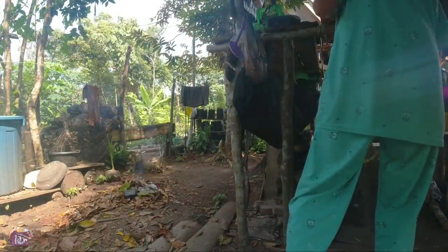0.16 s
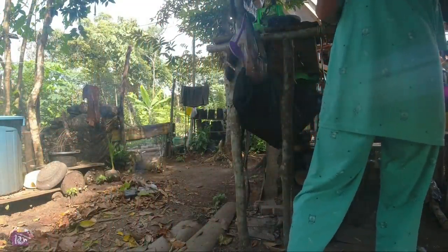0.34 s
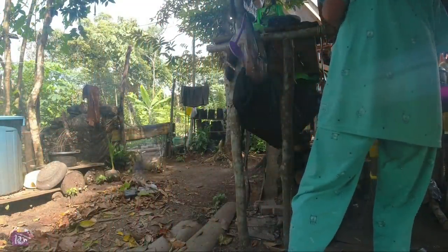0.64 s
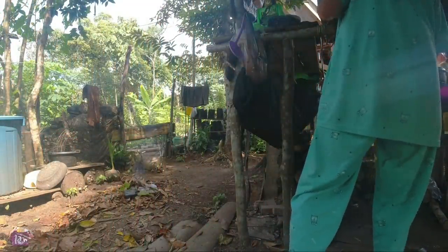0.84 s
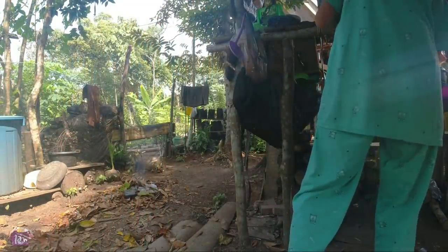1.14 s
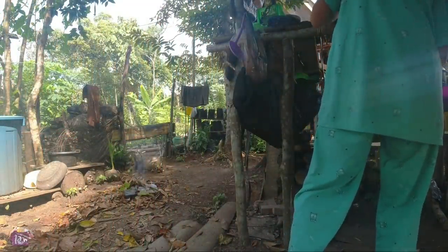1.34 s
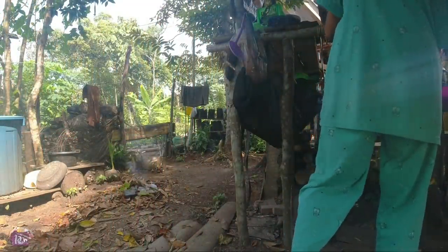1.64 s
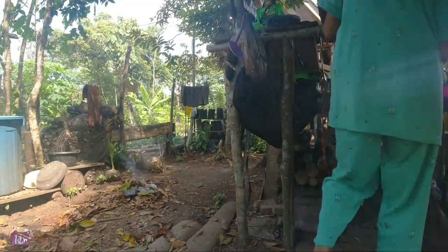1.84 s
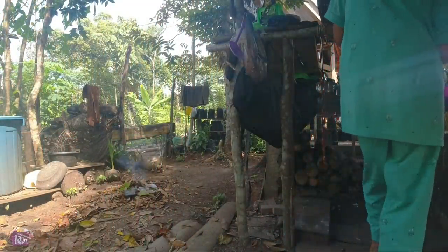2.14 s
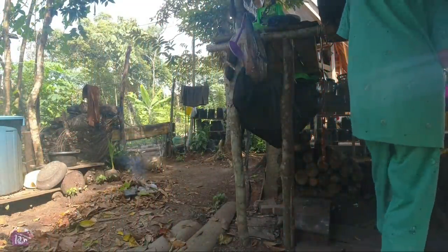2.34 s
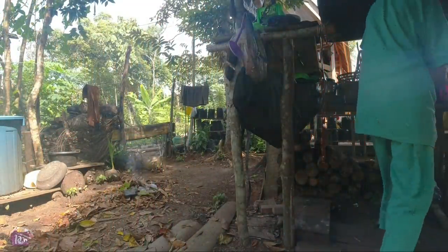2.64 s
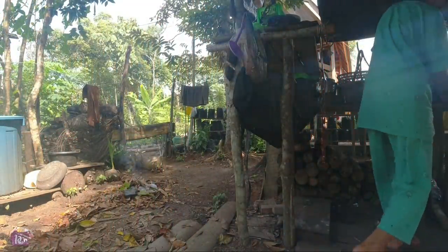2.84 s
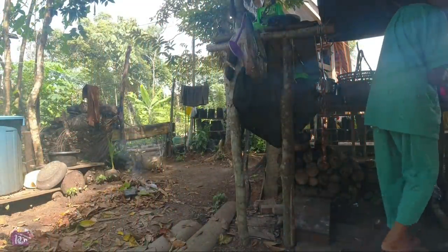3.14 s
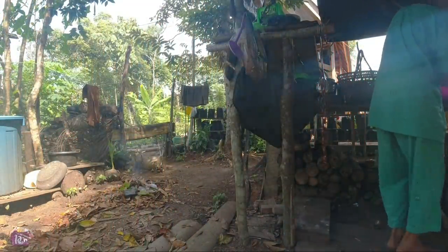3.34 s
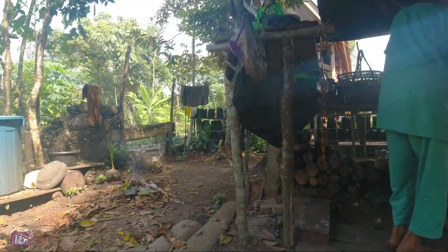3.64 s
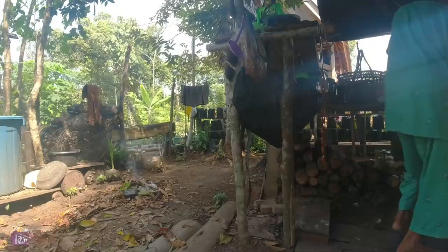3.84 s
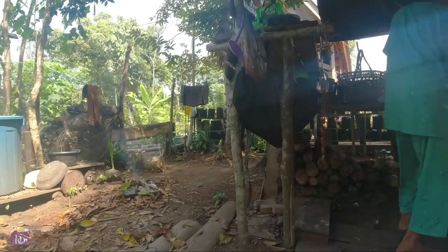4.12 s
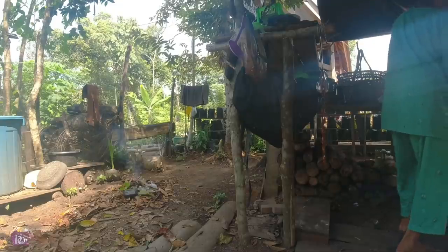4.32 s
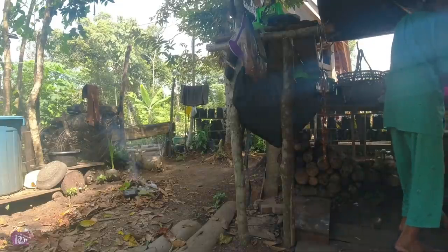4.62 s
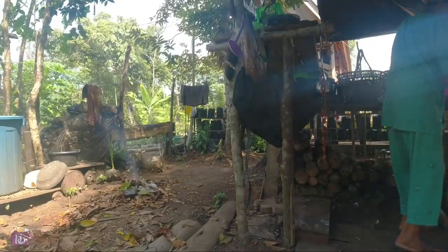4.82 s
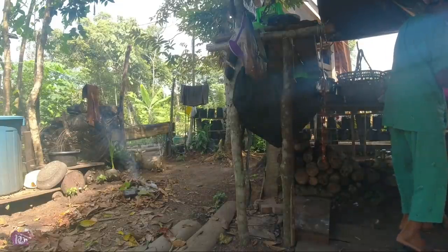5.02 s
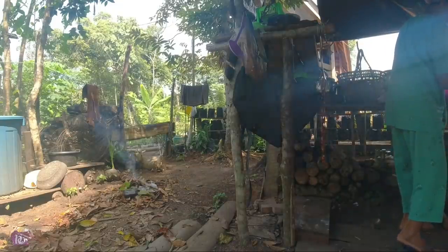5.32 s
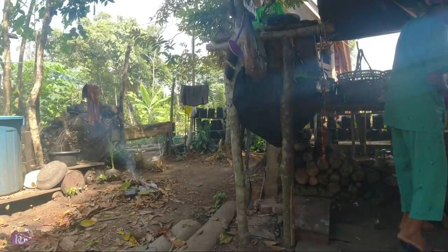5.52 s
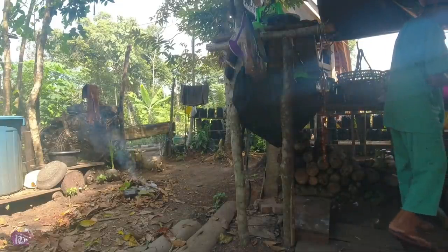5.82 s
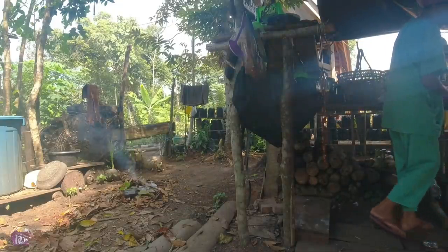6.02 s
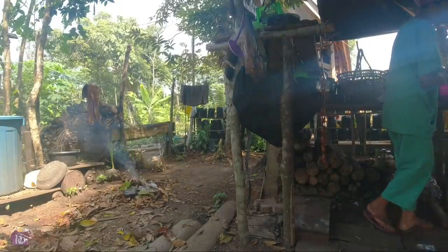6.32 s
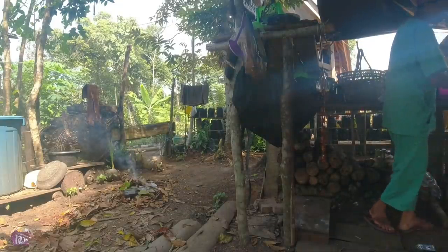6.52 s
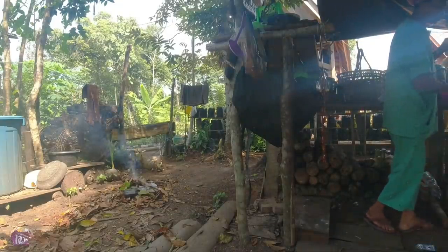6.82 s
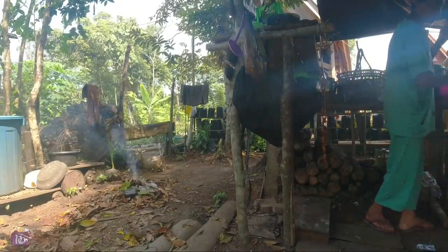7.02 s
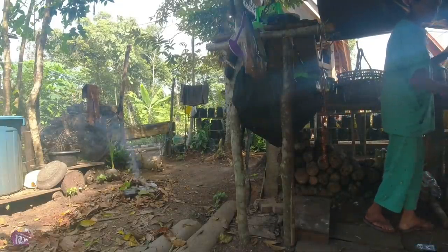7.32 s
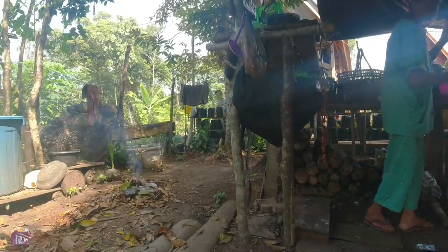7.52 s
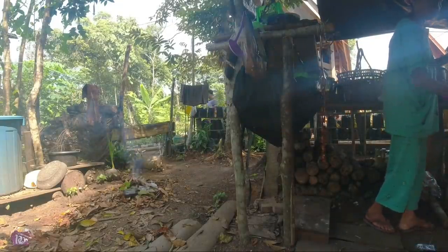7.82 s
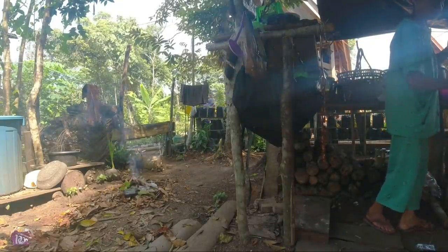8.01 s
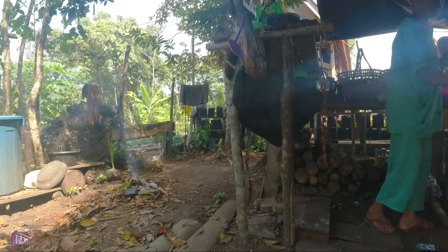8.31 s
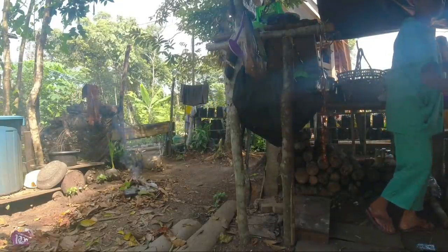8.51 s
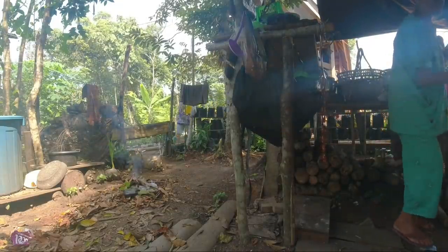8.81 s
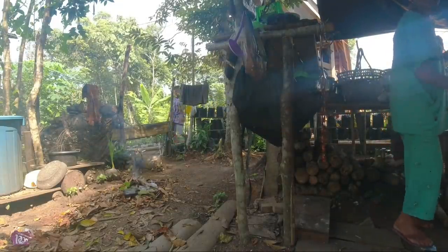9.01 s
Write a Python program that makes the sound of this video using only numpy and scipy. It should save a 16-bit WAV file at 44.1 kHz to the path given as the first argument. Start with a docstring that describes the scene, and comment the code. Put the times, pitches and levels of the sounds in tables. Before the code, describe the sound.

Rhythmic scratchy sweeping on bare earth beside an open shelter, broken by hollow wood knocks and crisp twig ticks, with faint insects and low hum.

```python
"""A stroke of a stiff stick broom on a dirt floor opens the scene; more follow, about one in 0.6 s, with pauses.
Twig tips scratch over grit as showers of tiny random slips, over the hollow swish of the bundle.
Now and then the broom knocks on wood (ringing tones), and sandals, swept bits and dry twigs scuff and tick
(clusters of small impacts). The open shelter answers these bumps briefly with a fading noise tail.
Insects sing in the trees around the yard as fluttering thin tones, over quiet air and a low wavering hum."""
import sys
import numpy as np
from scipy import signal
from scipy.fft import rfft, irfft, next_fast_len
from scipy.io import wavfile
from scipy.ndimage import uniform_filter1d, map_coordinates

SR = 44100
rng = np.random.default_rng(int(sys.argv[2]) if len(sys.argv) > 2 else 0)


def digitize_waveform(pressure):
    """Quantize a signal to 16-bit integers and store it at the path in sys.argv[1].

    Rows of a 2-D input are taken as channels; values are limited to [-1, 1].
    """
    field = np.atleast_2d(pressure).T
    bounded = np.clip(field, -1, 1)
    quanta = np.round(bounded * 32767).astype(np.int16)
    wavfile.write(sys.argv[1], SR, quanta)


N = 403956

# First twigs touch before the landing, the rest settle just after it, then the arm presses down.
TOUCH_S, SETTLE_S, PRESS_S = 0.055, 0.0073, 0.14
SAG_DB, LIFT_S = 1.37, 0.077  # pressure eases along the stroke, then the broom is lifted
# The last twigs trail on, then leave the ground.
TRAIL_DB_PER_S, LEAVE_S, OFF_DB = 57, 0.33, -54
SLAP_AFTER_S, SLAP_WIDTH_S = 0.046, 0.034  # the bundle slaps down behind the first twigs
TIPS_GROW = 1.2  # dB of tip hiss for each dB of scratch

# The strokes of the broom. Each row: landing in seconds, scratch level in dB, fine tips over the scratch in dB,
# how much lighter it is at first in dB, lift after so many seconds, how much lighter once lifted in dB,
# trailing time in seconds, slap relative to the scratch in dB, landing thump level in dB.
BROOM_STROKES = [(-0.05, -44, 5.5, 11, 0.19, 1, .1, -15, -60), (0.495, -58, 2, 0.5, 0.18, 6, .02, -10, -57),
                 (0.534, -46, 3.5, 2.5, 0.14, 4.5, .02, -17, -49),
                 (0.775, -47.5, 4, -0.5, 0.13, 9, 0.022, -14, -62),
                 (1.165, -43.5, 3.0, 11, 0.27, 9.5, 0.063, -8.5, -50.5),
                 (1.744, -44.6, 5.5, 5.9, 0.27, 9.5, 0.017, -10, -49),
                 (2.972, -42.5, 4.5, 8.5, 0.26, 13, .11, -2.5, -54),
                 (3.66, -42.5, 5, 4, 0.26, 14, 0.048, -4.5, -52),
                 (4.322, -44.5, 6, 3, 0.27, 14, 0.047, -3.5, -47),
                 (4.849, -44.0, 5.5, 10, 0.31, 11, 0.047, -4.5, -49),
                 (5.49, -42.5, 4.5, 8, 0.27, 9.5, 0.15, -15, -52.5),
                 (6.113, -41, 5, 11.5, 0.22, 6.6, 0.18, -16, -50),
                 (6.766, -43.5, 4.2, 8.5, 0.3, 12.5, 0.073, -1, -40),
                 (7.346, -43, 5, 14, 0.31, 10.5, 0.065, -5.5, -36),
                 (7.945, -44.5, 5, 9, 0.27, 9, 0.022, -21, -57.5),
                 (8.59, -44.0, 4.1, 15, 0.2, 8, .13, -14.5, -67),
                 (9.11, -43.5, 4.5, 10, 0.29, 17.5, .1, -13, -55)]


def strokes():
    """Each stroke lands, slaps, presses, lifts, trails and leaves; gives the scratch and tip levels in dB."""
    scratch, tips = np.full((2, N), 1e-14)
    for s, db, tips_db, light_db, hold_s, lifted_db, trail_s, slap_db, _ in BROOM_STROKES:
        t = np.arange(N) / SR - s
        lifted_s = hold_s + LIFT_S
        trailed_s = lifted_s + trail_s
        # the stroke's course: seconds from the landing, dB
        shape = [(-TOUCH_S, OFF_DB),
                 (SETTLE_S, -light_db),
                 (PRESS_S, 0),
                 (hold_s, -SAG_DB),
                 (lifted_s, -lifted_db),
                 (trailed_s, -lifted_db - TRAIL_DB_PER_S * trail_s),
                 (trailed_s + LEAVE_S, OFF_DB)]
        drag = amp(np.interp(t, *np.transpose(shape), left=-np.inf, right=-np.inf))
        slap = amp(slap_db) * np.exp(-((t - SLAP_AFTER_S) / SLAP_WIDTH_S) ** 2)
        effort = drag ** 2 + slap ** 2
        scratch += amp(db) ** 2 * effort
        tips += amp(db + tips_db) ** 2 * effort ** TIPS_GROW
    return 10 * np.log10(scratch), 10 * np.log10(tips)


# The tone colour of twigs dragged on dirt. Each row: frequency in Hz, relative strength per Hz in dB.
SCRATCH_COLOUR = [(90, -36), (200, -26), (350, -18), (650, -13.5), (800, -9.5), (930, -1.5), (1150, -6.5),
                  (1600, -4), (2700, 0.5), (4800, 2), (7200, -3), (9000, -0.5), (12000, -16.5)]
# The tone colour of their fine tips. Each row: frequency in Hz, relative strength per Hz in dB.
TIPS_COLOUR = [(3000, -38), (7200, -19.5), (8500, -9), (9800, -7.5), (11700, -8.5), (12500, -7),
               (13200, -6), (14400, 0.5), (15300, 0)]
# The tone colour of the hollow bundle. Each row: frequency in Hz, relative strength per Hz in dB.
HOLLOW_COLOUR = [(90, -10), (200, -4.5), (400, 0), (900, 2), (1400, -2.5), (2600, -29)]
# The course of the bundle's hollow swish. Each row: time in seconds, relative level in dB.
SWISH_COURSE = [(0, -52.5), (2, -54.5), (3.1, -67.5), (4.5, -80), (6.3, -67), (8, -59), (9.16, -61)]


def broom(scratch_db, tips_db):
    """The harder the stroke, the more tips slip each second; the bundle chatters as it drags."""
    pressure = amp(scratch_db - scratch_db.max())
    rate = 3000 + 6000 * pressure  # slips a second
    chatter = amp(0.29 * wobble(70) + 0.58 * wobble(22))

    scratch_slips = twig_slips(rate, spread_db=4.0, dust=1.0, patch_db=3.0)
    scratch = amp(scratch_db + 3.5) * coloured(scratch_slips, SCRATCH_COLOUR)

    tip_slips = twig_slips(rate, spread_db=3.0, dust=1.4, patch_db=3.5)
    tips = amp(tips_db + 7.0) * coloured(tip_slips, TIPS_COLOUR)

    # the thick stems touch less often and sound lower
    stem_slips = twig_slips(rate / 20, spread_db=2.5, dust=0.96, patch_db=5)
    swish_level = amp(curves(SWISH_COURSE)[0] + 4) * pressure
    swish = swish_level * coloured(stem_slips, HOLLOW_COLOUR)
    return chatter * (scratch + tips + nook(swish))


def twig_slips(rate, spread_db, dust, patch_db):
    """Random slips of twig tips, rate a second, on dust noise; the colour varies in random narrow patches."""
    happens = rng.random(N) < rate / SR
    sizes = happens * amp(spread_db * rng.random(N)) / np.sqrt(rate)
    slips = unit(sizes * rng.uniform(-1.0, 1, (2, N)))
    slips = slips + dust * rng.standard_normal((2, N))
    # patches: narrow bands that get randomly louder and softer
    z = signal.stft(slips, nperseg=1024)[2]
    patches = uniform_filter1d(rng.standard_normal(z.shape), size=2, axis=1)
    patches = uniform_filter1d(patches, size=6, axis=2)
    return signal.istft(z * amp(patch_db * unit(patches)), nperseg=1024)[1][:, :N]


# Thin high tones that linger after the strokes. Each row: pitch in Hz, level relative to the scratch in dB.
LINGERING_TONES = [(7120, -29), (7540, -26.5)]


def aftertones(scratch_db, lag_s=0.21):
    """Faint fluttering high tones follow the level of the strokes a little late."""
    late_db = np.interp(np.arange(N) - lag_s * SR, np.arange(N), scratch_db)
    tones = np.zeros(N)
    for hz, db in LINGERING_TONES:
        tones += amp(late_db + db + 1.0 * wobble(5.8)) * insect(hz, waver_hz=40)
    return tones


# Hard knocks on wood. Each row: start in seconds, level in dB, ring length relative to the wood's own.
WOOD_KNOCKS = [(2.653, -21, 0.85), (4.033, -43.5, .7), (8.955, -24.5, 1.5)]
# The tones of the knocked wood. Each row: pitch in Hz, typical level in dB, time to fade by 60 dB in seconds.
WOOD_TONES = [(291, -3.5, 0.031), (411.5, 3, 0.081), (491, 2, 0.043), (580, 2, 0.042), (674, -9.5, 0.058),
              (883, -10.5, 0.061), (995, -7, 0.083), (1410, -25, 0.049)]


def knocks(contact_s=0.01):
    """The wood is driven while the contact lasts, then rings out quickly."""
    track, t = np.zeros(N), np.arange(SR // 4) / SR
    free = np.maximum(t - contact_s, 0)  # seconds since the contact ended
    for s, db, length in WOOD_KNOCKS:
        ring = np.zeros(len(t))
        for k, (hz, level, t60) in enumerate(WOOD_TONES):
            fade = amp(level + rng.normal(0, 1) - 60 * free / (length * t60))
            ring += (-1) ** k * fade * np.sin(2 * np.pi * hz * t)
        rub_noise = rng.standard_normal(len(t)) * amp(-60 * free / 0.095)
        rub = filtered(rub_noise, lambda f: resonance(f, 1110, 700) ** 2)
        onset = 1 - np.exp(-t / 0.00066)
        blow = (ring + 1.4 * rub) * onset
        add(track, s, amp(db + 2.0) * blow / np.abs(blow).max())
    return np.array([track, track])


THUMP_HZ, THUMP_T60_S = 875, 0.19  # the dull sound of the broom landing
THUD_HZ, THUD_T60_S = 152, 0.24  # the ground gives under a scuff or a knock
KNOCK_THUD_DB = -26  # relative to the knock's level in its table
SNAP_DB, SNAP_RATIO = -14, 2.1  # every tick has a crisp edge, this much weaker and higher

# Sandals and swept bits scuff the ground. Each row: start in seconds, level in dB, centre pitch in Hz,
# time to fade by 60 dB in seconds, level of the deep thud in dB.
GROUND_SCUFFS = [(0.481, -43, 545, 0.22, -55.5), (0.512, -44.5, 820, 0.24, -63),
                 (0.540, -41.5, 560, 0.25, -64), (1.190, -44.5, 380, 0.073, -71),
                 (1.769, -46, 400, 0.054, -63), (2.208, -58.5, 907, 0.33, -77),
                 (2.578, -55, 1200, 0.24, -62), (2.972, -44, 597, 0.12, -67),
                 (3.404, -46.5, 421, 0.14, -65), (3.423, -45, 1430, 0.15, -70),
                 (3.546, -57.5, 420, 0.14, -68), (3.590, -42.5, 486, 0.14, -65),
                 (3.622, -49, 1100, 0.57, -53), (3.672, -43.5, 606, 0.037, -58),
                 (4.05, -59, 500, 0.18, -63), (4.155, -55, 256, 0.26, -54.5),
                 (4.182, -52.5, 1400, 0.15, -62), (4.243, -56, 422, 0.19, -56), (4.355, -45, 850, .13, -60),
                 (4.827, -53, 1307, .11, -76), (6.788, -35.5, 910, 0.24, -76),
                 (7.333, -44, 1110, 0.14, -78.5), (7.355, -37, 540, 0.14, -74),
                 (8.925, -48, 885, 0.27, -58), (8.949, -42.5, 1480, 0.19, -59.5),
                 (8.984, -45.5, 330, 0.23, -50)]
# Dry twigs and sticks tick. Each row: start in seconds, level in dB, pitch in Hz,
# time to fade by 60 dB in seconds.
TWIG_TICKS = [(1.191, -33.5, 790, 0.071), (2.575, -45, 3200, 0.19), (2.760, -67, 3000, 0.068),
              (2.903, -52.5, 3060, 0.049), (3.591, -54, 1920, 0.12), (3.620, -50, 1960, 0.053),
              (4.181, -53, 2790, .1), (6.857, -43, 4460, 0.044), (7.353, -37, 4330, 0.077),
              (8.048, -27, 5220, 0.015), (8.199, -47, 1100, .045), (8.274, -48, 1886, 0.046)]


def scuffs():
    """Dull thumps of the landing broom, broad scuffs on dirt with deep thuds, and sharper ticks of dry twigs."""
    thumps = [(max(s, 0), db, THUMP_HZ, THUMP_T60_S) for s, *_, db in BROOM_STROKES]
    rubs = [(s, db, hz, t60) for s, db, hz, t60, _ in GROUND_SCUFFS]
    scuff_thuds = [(s, db, THUD_HZ, THUD_T60_S) for s, *_, db in GROUND_SCUFFS]
    knock_thuds = [(s, db + KNOCK_THUD_DB, THUD_HZ, THUD_T60_S) for s, db, _ in WOOD_KNOCKS]
    snaps = [(s, db + SNAP_DB, hz * SNAP_RATIO, t60) for s, db, hz, t60 in TWIG_TICKS]

    dull = nook(clusters(thumps + rubs + scuff_thuds + knock_thuds, breadth=2.37))
    sharp = clusters(TWIG_TICKS, breadth=0.39) + clusters(snaps, breadth=0.7)
    return amp(-0.5) * dull + sharp


def clusters(table, breadth):
    """Each row is a fading cluster of small impacts through one resonance, its width set by breadth times pitch."""
    track, t = np.zeros((2, N)), np.arange(SR // 4) / SR
    for s, db, hz, t60 in table:
        grains = rng.random(len(t)) < 1400 / SR  # about 1400 stronger impacts a second
        impacts = rng.standard_normal((2, len(t))) * (0.49 + grains * 2)
        fade = amp(-60 * t / t60) * (1 - np.exp(-t / 0.001))

        def body(f):
            return resonance(f, hz, breadth * hz) ** 2 / (1 + (f / (3.0 * hz)) ** 4)

        bump = filtered(impacts * fade, body)
        # filtering must not change the loudness
        even = np.sqrt(np.mean(fade ** 2) / np.mean(bump ** 2, axis=1, keepdims=True))
        add(track, s, amp(db + 1.5) * bump * even)
    return stereo(track)


# Resonances of the space under the roof. Each row: pitch in Hz, width in Hz, gain as a plain factor.
ROOF_RESONANCES = [(111, 28, 0.87), (280, 53, 0.61), (422, 18, 0.75), (903, 35, 0.52), (1450, 24, 0.62)]


def nook(x):
    """The space under the roof lifts a few low pitches."""
    def lift(f):
        return 1 + sum(gain * resonance(f, hz, width) for hz, width, gain in ROOF_RESONANCES)
    return filtered(x, lift)


# How long the shelter answers. Each row: frequency in Hz, time to fade by 60 dB in seconds.
SHELTER_FADE = [(150, 0.25), (450, 0.27), (2000, 0.17), (12000, 0.035)]


def shelter(x):
    """The roof and walls answer with a brief noise tail, longest in the low middle."""
    hz, t, z = signal.stft(rng.standard_normal((2, SR // 2)), SR, nperseg=256)
    fade = amp(-60 * t / along(SHELTER_FADE, hz)[:, None])
    tail = signal.istft(z * fade, SR, nperseg=256)[1]
    tail = tail / np.linalg.norm(tail[0])
    return stereo(signal.fftconvolve(x, tail, axes=1)[:, :N])


# Swells of the nearest cricket's trill. Each row: middle of the swell in seconds, level in dB.
CRICKET_SWELLS = [(2.42, -84), (2.72, -78), (2.85, -71), (4.23, -75), (5.42, -77), (7.271, -77),
                  (8.56, -74)]


def cricket(swell_s=0.075, between_db=-83):
    """A faint running trill, one fluttering tone, swells now and then."""
    t = np.arange(N) / SR
    strength = np.full(N, amp(between_db))
    for s, db in CRICKET_SWELLS:
        strength += amp(db) * np.exp(-((t - s) / swell_s) ** 2)
    return strength * insect(4590, waver_hz=25)


def insect(hz, waver_hz):
    """A thin tone of rms 1 whose pitch and strength flutter."""
    phase = 2 * np.pi * np.cumsum(hz + waver_hz * wobble(90)) / SR
    return unit(np.sin(phase) * amp(5.3 * wobble(60)))


# The tone colour of the outdoor air. Each row: frequency in Hz, relative strength per Hz in dB.
AIR_COLOUR = [(25, -0.5), (60, 4), (100, -10.5), (180, -15.5), (500, -22), (1100, -21), (2200, -23.5),
              (4000, -25.5), (5500, -30), (6600, -18.5), (8500, -34), (15000, -38)]


def yard():
    """Quiet outdoor air as coloured noise, a steady insect buzz and a cricket."""
    air = amp(-62.5 + wobble(8.7)) * coloured(rng.standard_normal((2, N)), AIR_COLOUR)
    buzz = amp(-83 + 0.88 * wobble(4.8)) * insect(6380, waver_hz=121.2)
    return air + buzz + cricket()


# The course of the low hum. Each row: time in seconds, pitch in Hz, level in dB.
HUM_COURSE = [(0.0, 45.0, -43), (0.25, 45.3, -52), (0.86, 49.9, -86), (1.02, 47.1, -68),
              (1.35, 47.8, -52.5), (1.5, 51.16, -53.5), (2.17, 50.3, -61), (2.29, 52.3, -59),
              (2.58, 50.8, -51.5), (3.77, 50.6, -50.5), (3.85, 48.3, -51.5), (5.31, 46.17, -57.5),
              (6.5, 46.35, -54), (7.63, 48.2, -50), (8.32, 51.7, -51), (8.62, 51.8, -47), (8.78, 54.5, -53),
              (9.16, 54.4, -44)]


def hum():
    """A deep tone drifts in pitch and throbs slightly, with a faint octave."""
    hz, db = curves(HUM_COURSE)
    phase = 2 * np.pi * np.cumsum(hz) / SR
    throb = np.sin(2 * np.pi * np.cumsum(14 + wobble(1.8)) / SR)  # about 14 times a second
    level = amp(db + 1.0 * throb + 0.57 * wobble(14))
    tone = np.sin(phase) + amp(-26.5) * np.sin(2 * phase)
    return level * tone * np.sqrt(2)


# How alike left and right are. Each row: frequency in Hz, likeness (1 the same, 0 unrelated, below 0 opposed).
LEFT_RIGHT_LIKENESS = [(200, 0.89), (650, 0.84), (1100, 0.61), (1800, 0.32), (4000, -0.11), (6700, 0.74),
                       (8600, -0.051), (10800, 0.75), (14000, 0.21)]


def stereo(pair):
    """Two unrelated signals become left and right, alike in the bass and variously alike above."""
    def mix(f):
        turn = np.arccos(np.clip(along(LEFT_RIGHT_LIKENESS, f), -1, 1)) / 2
        return np.array([np.cos(turn), np.sin(turn)])
    mid, side = filtered(pair, mix)
    return np.array([mid + side, mid - side])


def coloured(pair, spectrum):
    """Stereo sound of rms 1 with the given spectrum."""
    return unit(stereo(filtered(pair, lambda f: amp(along(spectrum, f)))))


def amp(db):
    """Decibels to gain."""
    return 10 ** (np.asarray(db) / 20)


def unit(x):
    """Scaled to rms 1."""
    return x / np.sqrt(np.mean(x ** 2) + 1e-20)


def along(points, hz):
    """(Hz, value) points read on a log frequency axis."""
    f, v = np.transpose(points)
    return np.interp(np.log(hz + 1), np.log(f), v)


def curves(rows):
    """One value per sample for each column after the time."""
    s, *cols = np.transpose(rows)
    return [np.interp(np.arange(N) / SR, s, c) for c in cols]


def wobble(rate):
    """A smooth random curve, rate knots a second."""
    knots = rng.standard_normal(int(N * rate / SR) + 4)
    return map_coordinates(knots, [np.arange(N) * rate / SR])


def filtered(x, response):
    """x passed through a filter given as a complex response of frequency."""
    n = x.shape[-1]
    m = next_fast_len(n + 8192)  # spare room so the end does not wrap onto the start
    return irfft(rfft(x, m) * response(np.fft.rfftfreq(m, 1 / SR)), m)[..., :n]


def resonance(f, hz, width):
    """Causal response of one resonance."""
    return 1j * f * width / (hz * hz - f * f + 1j * f * width)


def add(track, s, sound):
    """Mix a sound into the track at time s in seconds."""
    part = track[..., round(s * SR):][..., :sound.shape[-1]]
    part += sound[..., :part.shape[-1]]


def scene():
    """Broom and bumps under the shelter, the yard and the hum around them."""
    scratch_db, tips_db = strokes()
    sweeping = broom(scratch_db, tips_db) + aftertones(scratch_db)
    bumps = knocks() + scuffs()
    answer = amp(-18.5) * shelter(bumps)
    return sweeping + bumps + answer + yard() + hum()


def record(dry, top_hz=15600):
    """The treble ends at a band limit, with an edge 200 Hz wide."""
    return filtered(dry, lambda f: np.clip((top_hz - f) / 200 + 0.5, 0, 1))


dry = scene()
out = record(dry)
digitize_waveform(out)
```